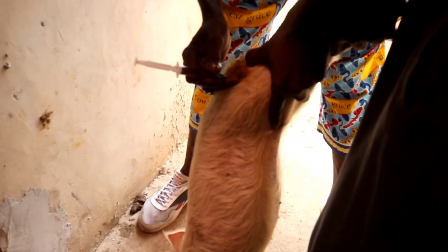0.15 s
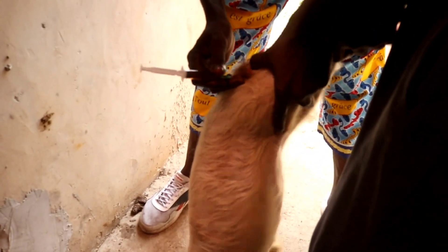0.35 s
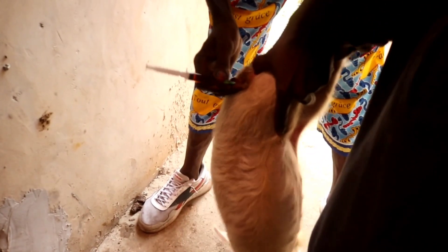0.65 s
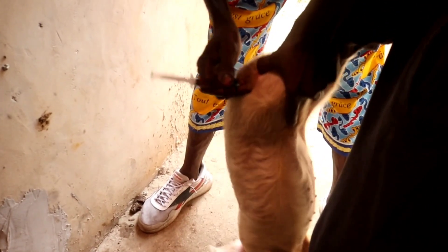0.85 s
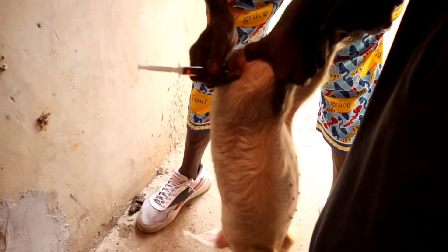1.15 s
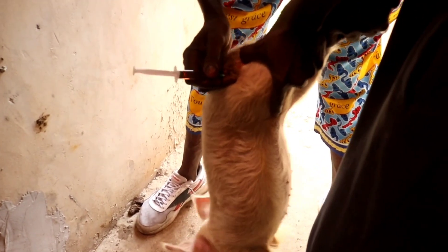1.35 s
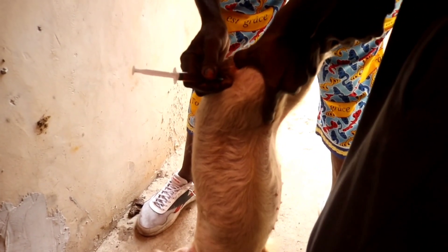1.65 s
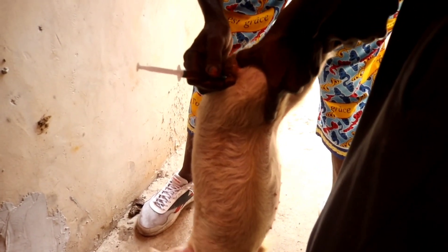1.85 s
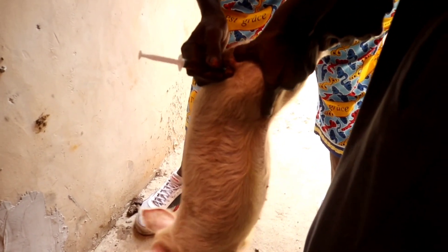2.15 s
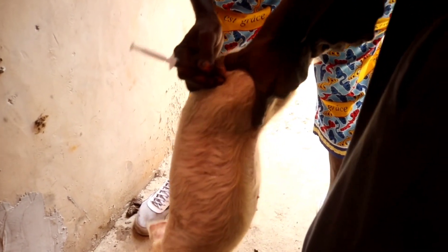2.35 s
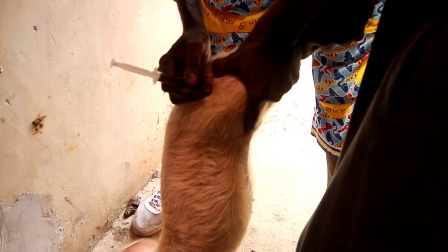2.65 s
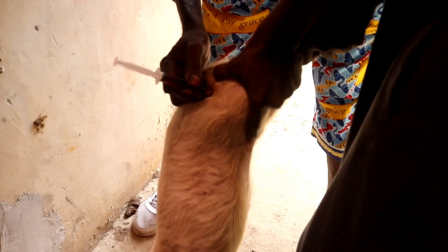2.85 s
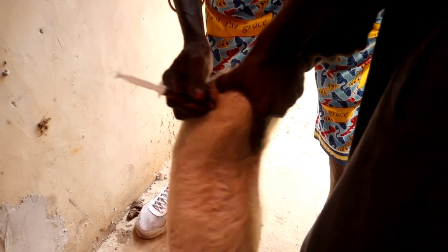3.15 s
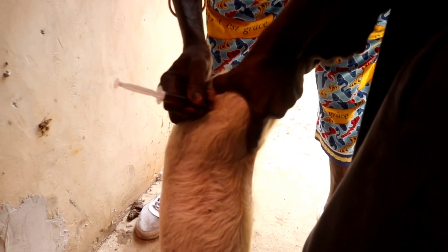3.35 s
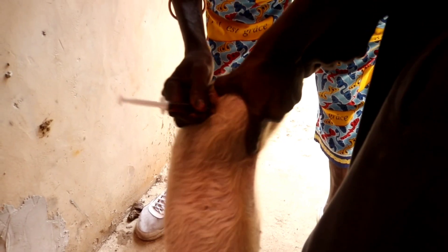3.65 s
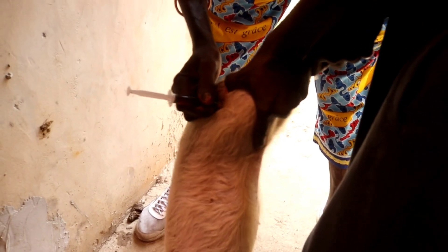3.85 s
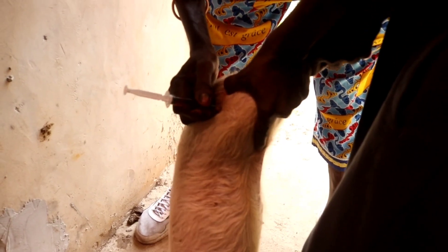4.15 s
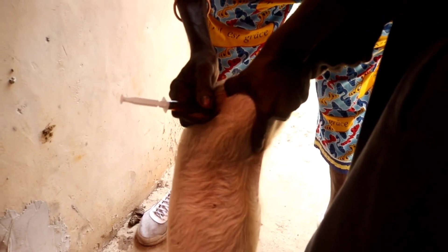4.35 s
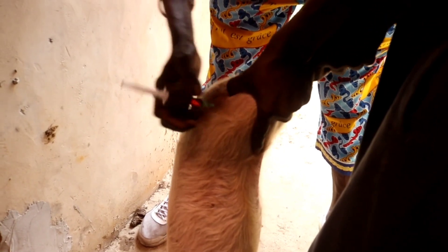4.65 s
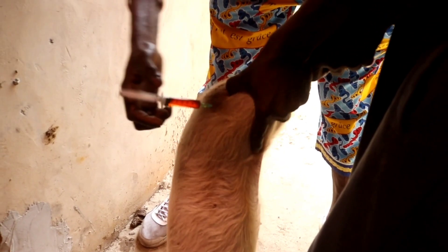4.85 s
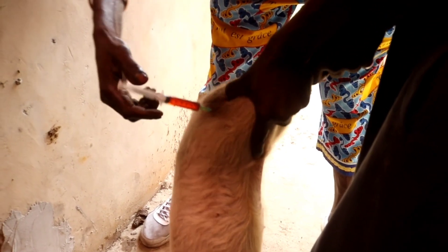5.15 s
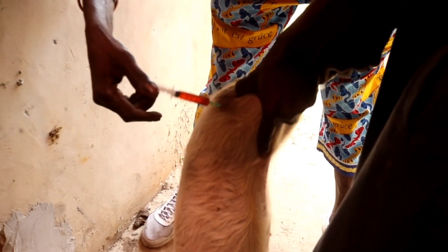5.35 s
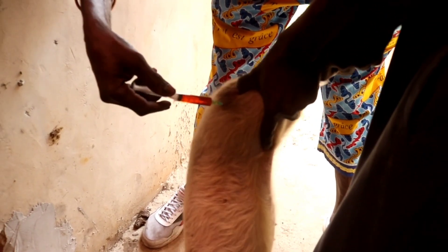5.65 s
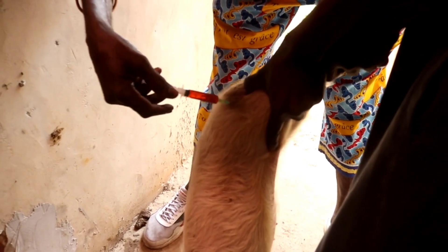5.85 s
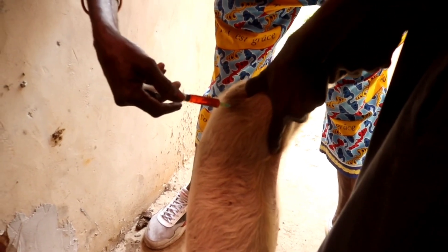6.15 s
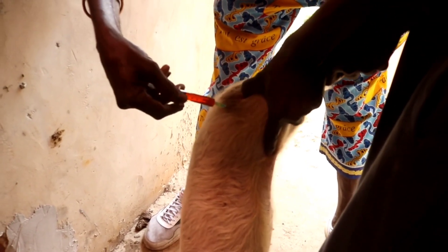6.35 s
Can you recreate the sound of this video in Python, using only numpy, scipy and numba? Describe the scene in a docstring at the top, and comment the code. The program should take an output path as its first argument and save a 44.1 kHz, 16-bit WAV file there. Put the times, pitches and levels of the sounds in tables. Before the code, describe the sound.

A piglet cries out close to a small stereo microphone in a concrete barn. Its short, throaty, rattling barks come about four a second. The early ones are the loudest and break into harsh screams, with hoarse gasps between them. Then the animal tires: the barks grow weaker and further apart, and the last one sinks into a soft moan. Each call leaves a short echo over faint room tone.

```python
"""In a barn, close to a piglet held by the hind legs beside a concrete wall; a small stereo microphone.
An earlier bark is still dying away as the next begin, each a short roll of slow vocal-fold flaps
ringing in the throat. The hardest come early, break into a harsh scream and drive the limiter.
Hoarse gasps fall between the early barks. Then the animal tires, the barks come weaker and further
apart, and the last one ends in a soft moan."""
import sys
import numpy as np
from scipy import signal
from scipy.fft import rfft, irfft
from scipy.io import wavfile
from scipy.ndimage import uniform_filter1d, minimum_filter1d
from numba import njit

SR = 44100
rng = np.random.default_rng(int(sys.argv[2]) if len(sys.argv) > 2 else 0)


def file_out(sig):
    """Save sig as 16-bit WAV at sys.argv[1]."""
    # one column per channel
    cols = np.atleast_2d(sig).T
    # limit, then scale
    lim = np.clip(cols, -1, 1)
    pcm = np.round(lim * 32767).astype(np.int16)
    wavfile.write(sys.argv[1], SR, pcm)


N = 287077

# damping of the five throat resonances, lowest first: (width [Hz])
THROAT_WIDTHS = [77.5, 183.6, 211, 223, 408]


def from_db(db):
    """Decibels to gain."""
    return 10 ** (np.asarray(db) / 20)


def rms_one(x):
    """Scale to rms 1."""
    return x / np.sqrt(np.mean(x ** 2) + 1e-20)


def at_hz(points, hz):
    """Read a curve on a log frequency axis."""
    points_hz, values = np.transpose(points)
    return np.interp(np.log(hz), np.log(points_hz), values)


def filtered(x, hz, kind, order=2):
    """Butterworth filter."""
    return signal.sosfilt(signal.butter(order, hz, kind, fs=SR, output="sos"), x)


def wobble(count, hz):
    """Random wavering below hz, rms 1."""
    return rms_one(filtered(rng.standard_normal(count + 2000), hz, "low")[2000:])


def add(track, start, sound):
    """Mix a sound in at a time in seconds."""
    i = round(start * SR)
    track[i:i + len(sound)] += sound[:N - i]


@njit
def resonate(x, angle, r):
    """Two-pole resonance with a moving centre, gain 1 at its peak."""
    y = np.zeros(len(x))
    for i in range(2, len(x)):
        drive = (1 - r * r) / 2 * (x[i] - x[i - 2])
        y[i] = drive + 2 * r * np.cos(angle[i]) * y[i - 1] - r * r * y[i - 2]
    return y


def tract(x, centres_hz, widths_hz, levels_db):
    """An airway: resonances in parallel, signs alternating."""
    out = 0
    for k, (hz, width, db) in enumerate(zip(centres_hz, widths_hz, levels_db)):
        angle = 2 * np.pi * hz / SR * np.ones(len(x))
        ring = resonate(x, angle, np.exp(-np.pi * width / SR))
        out = out + (-1) ** k * from_db(db) * ring / np.sqrt(width)
    return out


def pulses(hz, jitter):
    """One click a cycle, uneven in spacing and strength."""
    cycles = np.cumsum(hz * np.exp(jitter * wobble(len(hz), 400))) / SR
    return np.diff(np.floor(cycles), prepend=0) * from_db(2 * jitter * rng.standard_normal(len(hz)))


def partials(curve, levels_db, jitter, follows):
    """A wavering tone; the curve gives time, level and the pitch of partial number `follows`."""
    times, hz, db = np.transpose(curve)
    t = times[0] + np.arange(round((times[-1] - times[0]) * SR)) / SR
    pitch_hz = np.interp(t, times, hz) / follows * (1 + jitter * wobble(len(t), 190))
    phase = 2 * np.pi * np.cumsum(pitch_hz) / SR
    tone = sum(from_db(level) * np.sin((k + 1) * phase) for k, level in enumerate(levels_db))
    return np.sqrt(2) * tone * from_db(np.interp(t, times, db)) * signal.windows.tukey(len(t), .15)


def still_air(level_db=-60):
    """Room tone of the barn: faint steady noise with a low hum, nearly centred."""
    # noise spectrum: (frequency [Hz], relative density [dB])
    spectrum = [(24, -65.5), (40, -12.5), (73, -9.5), (113, -8), (177, -13.5), (502, -33.5), (728, -23.5),
                (1730, -19.5), (3220, -30), (15000, -42.5)]
    hz = np.maximum(np.fft.rfftfreq(N, 1 / SR), 1)
    mid, side = irfft(rfft(rng.standard_normal((2, N))) * from_db(at_hz(spectrum, hz)), N)
    return from_db(level_db) * rms_one(mid + 0.13 * side * [[1], [-1]])


def lingering_bark():
    """An earlier bark dies away in the barn, diffuse and unlike at the microphone's two ports."""
    # its tail: (level [dB], fall [dB/s], five resonances [Hz], 2nd to 5th over the 1st [dB])
    tail = (-33.5, 69.5, 662.5, 1403.5, 2602.5, 3082.5, 4285.5, -5, -12.5, -13, -16)
    level_db, fall_db_per_s = tail[:2]
    rings = [tract(rng.standard_normal(SR), tail[2:7], THROAT_WIDTHS, [0, *tail[7:]]) for port in "LR"]
    out = np.zeros((2, N))
    out[:, :SR] = rms_one(np.array(rings)) * from_db(level_db - fall_db_per_s * np.arange(SR) / SR)
    return out


def barn(x, shed_db=-9, shed_stretch=2.96):
    """Direct sound, then a dense tail dying band by band; the larger shed beyond rings on longer."""
    # reverberation of the barn: (frequency [Hz], time to fall 60 dB [s])
    decay_times = [(100, 0.2), (260, 0.37), (700, 0.25), (1800, 0.31), (4800, 0.32), (12800, 0.14)]
    # its strength at the microphone: (frequency [Hz], band gain [dB])
    echo_levels = [(100, -10), (300, 3), (700, 2), (2000, -4), (5000, -4.5), (13000, -13)]
    t = np.arange(SR) / SR
    response, edges_hz = np.zeros((2, SR)), 70 * 2 ** np.arange(0, 8, .5)
    for low, high in zip(edges_hz, edges_hz[1:]):
        hz = np.sqrt(low * high)
        t60 = at_hz(decay_times, hz)
        alike = np.clip(.9 - hz / 1600, 0, 1)   # long waves reach both ports alike
        mid, side = filtered(rng.standard_normal((2, SR)), [low, high], "band")
        band = np.sqrt(1 + alike) * mid + np.sqrt(1 - alike) * side * [[1], [-1]]
        decay = np.hypot(from_db(-60 * t / t60), from_db(shed_db - 60 * t / (t60 * shed_stretch)))
        decay *= np.clip(t / 0.013, 0, 1)   # the echoes build up
        response += band * decay / np.sqrt(2 * np.sum(decay ** 2)) * from_db(at_hz(echo_levels, hz))
    response[0, 0] += 1
    response[1, 2] += 1   # the direct sound reaches the right port two samples later
    return signal.fftconvolve(x[None], response, axes=1)[:, :N]


def scattered(sound, decay_s=.003):
    """Bright scatter off hands, legs and housing, unlike at each port and new as the animal squirms."""
    t = np.arange(round(7 * decay_s * SR)) / SR
    pattern = filtered(rng.standard_normal((2, len(t))), 1880, "high") * np.exp(-t / decay_s)
    return signal.fftconvolve(sound[None], pattern, axes=1) / np.sqrt(decay_s * SR / 2)


def moan():
    """The soft, sinking tone that ends the last bark, with its start time."""
    # its course: (time [s], pitch [Hz], level [dB])
    course = [(6.19, 194.6, -39), (6.235, 167.8, -47.5), (6.29, 151.7, -47), (6.33, 144.9, -46.5),
              (6.37, 147, -53), (6.42, 141.8, -58)]
    # its partials, lowest first: (gain [dB])
    partials_db = [-.5, -1.5, -13, -6, -1, -5, -3, -6, -6, -10]
    return course[0][0], partials(course, partials_db, jitter=.025, follows=1)


def whistle():
    """A high, rising tone inside the second bark's scream, with its start time."""
    # its course: (time [s], third partial [Hz], level [dB])
    course = [(0.361, 4264, -14), (0.375, 4424, -16), (.394, 4545, -18), (0.42, 4580, -8.5), (.44, 4553, 0)]
    # its partials, lowest first: (gain [dB])
    partials_db = [-12, -4, 0, -14]
    return course[0][0], partials(course, partials_db, jitter=.022, follows=3)


def gasp(start, end, level_db, second_hz, *upper_db):
    """Air drawn past fluttering folds: noise lightly beaten by uneven slow flaps."""
    # 1st, 3rd, 4th and 5th throat resonance on the in-breath: (centre [Hz])
    inhale_hz = [607, 1940, 2390, 3160]
    t = np.arange(round((end - start + .05) * SR)) / SR
    flutter = filtered(pulses(np.full(len(t), 65.), jitter=0.28), 138, "low")
    air = rng.standard_normal(len(t)) * (8 + rms_one(flutter))
    swell = np.sin(np.pi * np.clip(t / (end - start), 0, 1)) ** .7
    centres_hz = [inhale_hz[0], second_hz, *inhale_hz[1:]]
    breath = tract(air * swell, centres_hz, THROAT_WIDTHS, [0, *upper_db, -11])
    return from_db(level_db) * rms_one(filtered(breath, [330, 4520], "band", order=3))


def chest_boom(source, opening, peak_db):
    """The chest booms more as the breath runs out, and takes a larger share of a weak bark."""
    # chest resonances: (centre [Hz], width [Hz], gain [dB])
    modes = [(114, 26, -2), (184.3, 42, 3), (316, 102, -1)]
    gain_db = 17.5 - 0.32 * (peak_db + 18)
    return tract(source * opening ** 0.19, *np.transpose(modes)) * from_db(gain_db)


def treble_edge(bright):
    """The top of a bark, lifted by a high ring that stands out in a scream."""
    # the ring: (centre [Hz], width [Hz], gain [dB])
    high_ring = (5570, 1210, 6.4)
    hz, width, db = high_ring
    ringing = bright + tract(bright, [hz], [width], [db]) * np.sqrt(width)
    return filtered(filtered(ringing, 5940, "high", order=4), 4180, "low", order=1)


def nose(voice, scream_gain):
    """The nose draws off a band between the 2nd and 3rd resonance, less in a scream."""
    # the dip: (centre [Hz], width [Hz], depth [0-1])
    dip = (2050, 500, .45)
    hz, width, depth = dip
    band = np.sqrt(width) * tract(voice, [hz], [width], [0])
    return voice - depth / np.sqrt(1 + scream_gain ** 2) * band


def throat(opening, fifth_db, first_hz, second_hz, travel, fourth_hz, second_db, shut_db, open_db):
    """The mouth opens through the bark and moves the centres and levels of five resonances; their widths stay
    fixed."""
    # 1st and 2nd resonance: (rise per unit of glide at mouth travel 1 [Hz])
    rises_hz = [125, 190.1]
    glide = 1.5 * opening ** .8 - .4
    mouth = np.clip((opening - .15) / .7, 0, 1)
    centres_hz = [hz + rise * travel * (glide - .5) for hz, rise in zip([first_hz, second_hz], rises_hz)]
    upper_hz = [(2525, 2610), (3290, fourth_hz), (4354, 4470)]   # 3rd to 5th: (shut [Hz], open [Hz])
    centres_hz += [shut + (wide - shut) * glide for shut, wide in upper_hz]
    centres_hz[2] = np.minimum(centres_hz[2], centres_hz[3] - 380)   # neighbours stay apart
    upper_db = shut_db + (open_db - shut_db) * mouth
    trims_db = [second_db, upper_db, upper_db, fifth_db]
    base_db = [(.5, -2), (2, 0), (-2, 2), (-3, -6)]   # 2nd to 5th over the 1st: (shut [dB], open [dB])
    levels_db = [shut + (wide - shut) * mouth + trim for (shut, wide), trim in zip(base_db, trims_db)]
    return centres_hz, THROAT_WIDTHS, [0] + levels_db


def effort(opening, peak_db, swell_db, peak_at, sag_db=6):
    """Level in dB through a roll: a bent climb to the peak, then a sag to the last flap."""
    climb = np.clip(1 - opening / peak_at, 0, 1) ** 1.92
    return peak_db - swell_db * climb - sag_db * np.clip(opening - peak_at, 0, 1)


def scream(hz):
    """Tight folds buzz in rushing air; every second cycle is weaker, adding lines half-way between."""
    buzz = .5 * pulses(hz, jitter=.07) + pulses(hz / 2, jitter=.11)
    return rms_one(buzz - buzz.mean()) + .7 * rng.standard_normal(len(hz))


def flap_roll(t, first, last, flaps, slowing=.09, puff_s=.0025):
    """The folds flap shut with a click and a puff of air, more slowly at both ends of the roll."""
    even = np.linspace(0, 1, round(flaps))
    times = first + (last - first) * (even + slowing * np.sin(2 * np.pi * even) / (2 * np.pi))
    times[1:-1] += rng.normal(0, .0007, len(times) - 2)
    clicks = np.zeros(len(t))
    clicks[((times - first) * SR).astype(int)] = from_db(rng.normal(0, 1.4, len(times)))
    clicks[t > last - .002] *= from_db(-5)   # the last flap is softer as the breath gives out
    puffs = signal.lfilter([1], [1, -np.exp(-1 / (puff_s * SR))], clicks) * rng.standard_normal(len(t))
    return rms_one(clicks + 0.31 * puffs)


def bark(first, last, flaps, peak_db, swell_db, peak_at, scream_db, treble_db, *throat_shape):
    """Slow flaps and a scream locked to the second resonance ring in the throat and chest."""
    hoarse_db, scream_rise_s, release_s = -15, 0.027, 0.016
    t = first + np.arange(round((last - first + .075) * SR)) / SR
    opening = np.clip((t - first) / (last - first), 0, 1)
    peak_at = np.clip(peak_at, .05, 1)
    resonances = throat(opening, *throat_shape)
    roll = flap_roll(t, first, last, flaps)
    # a rasp lies under all flaps; the scream grows out of it shortly before the peak
    scream_start = first + 0.73 * peak_at * (last - first)
    scream_rise = np.clip((t - scream_start) / scream_rise_s, 0, 1)
    scream_gain = np.hypot(from_db(hoarse_db), from_db(scream_db) * scream_rise)
    rasp = scream_gain * scream(hz=resonances[0][1])
    flapping = roll * from_db(-0.45 * max(scream_db, 0))   # a throat tight enough to scream flaps less
    # effort holds the loudness, so a scream takes its share from the flaps
    level_db = effort(opening, peak_db, swell_db, peak_at)
    release = np.clip((last + .012 - t) / release_s, 0, 1)
    breath = from_db(level_db) * release / np.sqrt(1 + scream_gain ** 2)
    source = (flapping + rasp) * breath
    voice = tract(source, *resonances) / np.std(tract(roll, *resonances))
    voice = nose(filtered(voice, 503, "high", order=6), scream_gain)
    # harder breath and a wider mouth are brighter
    bright_db = treble_db + 10.5 + 2.8 * (level_db - peak_db) + 8 * opening
    bright = (filtered(flapping, 3600, "low") + from_db(7.5) * rasp) * breath * from_db(bright_db)
    return voice + treble_edge(bright) + chest_boom(source, opening, peak_db)


def piglet():
    """All the animal's calls, and what is scattered of them close by into each port."""
    # rolls of flaps: (first flap [s], last flap [s], flaps [count], peak effort [dB], swell to it [dB],
    # peak place in the roll [0-1], scream [dB], treble [dB], 5th resonance trim [dB],
    # 1st and 2nd resonance mid-glide [Hz], mouth travel [0-2], 4th resonance open [Hz],
    # 2nd resonance trim [dB], trim of 3rd and 4th when shut [dB], when open [dB])
    barks = [(0.097, 0.205, 10, -18.5, 28, 0.56, -5, -25, -2, 690, 1460, 1.09, 2860, -.5, -1.5, -0.5),
             (0.322, 0.446, 12, -8.5, 22.5, 0.36, 2.5, -11, 1.5, 700, 1523, 0.039, 3250, 1.5, -7, 3),
             (0.534, 0.631, 10, -9, 27, 0.48, 6, -20.5, -4, 662, 1595, 1.56, 3490, 1.5, -1, -3),
             (0.775, 0.865, 9, -10.5, 15, 0.63, 6.5, -17, -4, 684, 1592, 0.88, 3690, 0, -9, -0.5),
             (1.019, 1.106, 8, -14, 13.5, .65, 5, -23, 2, 708, 1310, 1.93, 3100, 2, -1.5, -0.5),
             (1.286, 1.349, 7, -11.5, 11, 0.43, 2.5, -18.5, 3, 662, 1587, 0.28, 3010, 0.5, .5, 2),
             (1.526, 1.603, 8, -15.5, 13.5, 0.78, -10, -28, -1, 715, 1514, 0.48, 3180, -2, 1, -4.5),
             (1.832, 1.914, 8, -19, 5, 1, -1, -26, -0.5, 690, 1480, .2, 3100, 0, 1, -2),
             (1.995, 2.032, 4, -38.5, -3.5, 0, 0, -49, -4, 670, 1490, 0.067, 3230, -5, -18, -23),
             (2.101, 2.182, 8, -20.5, 7.5, 0.82, 0, -24, 5, 602, 1470, 0.32, 2990, 5.5, -8, 5),
             (2.348, 2.426, 8, -19.5, 8.5, 0.99, -16, -20.5, -1.5, 688, 1386, 0.82, 3030, 1.5, -7.5, -2.5),
             (2.643, 2.743, 9, -21, 25, .28, -5, -25.5, -3.5, 640, 1435, 0.79, 2910, -2, -13.5, 2.5),
             (2.928, 3.03, 10, -18.5, 19.5, 0.32, -18, -22.5, -4, 688, 1465, 1.2, 3030, -2, 0, -2),
             (3.184, 3.276, 9, -17, 14, 0.52, -2.5, -32, -4, 698, 1550, 1.17, 3210, -3.5, -10, -7.5),
             (3.502, 3.595, 9, -17.5, 12.5, 0.37, -15, -21.5, -0.5, 680, 1511, .3, 3080, -2, -3.5, -2.5),
             (3.725, 3.796, 7, -15, 19, 1, -5.5, -32, -0.5, 683, 1423, 1.03, 2870, 3.5, -1, -7),
             (4.159, 4.238, 7, -20.5, 12.5, 0.83, -15, -16.5, 3, 685, 1415, 1.43, 3210, 2.5, -9, 2.5),
             (4.607, 4.688, 7, -21.5, 24.5, 0.65, -20, -19.5, 0, 666, 1417, 1.74, 3120, -1.5, -7, -2.5),
             (4.981, 5.077, 8, -25, 28, 0.66, -23, -31, 3.5, 610, 1273, 0.44, 3170, 1, -0.5, -0.5),
             (5.305, 5.386, 6, -20.5, 17.5, 0.44, -11, -22, -3.5, 686, 1478, 1.03, 3200, -2, -3, -2.5),
             (5.616, 5.696, 6, -25, 22.5, 0.5, -19, -20.5, 0.5, 735, 1445, 0.46, 3180, 1, -9, 0.5),
             (6.132, 6.226, 7, -26.5, 14.5, 0.29, -37, -15.5, 1, 703, 1370, 0.62, 3160, 2, -4, -5.5)]
    # in-breaths: (start [s], end [s], level [dB], 2nd resonance [Hz], 2nd to 4th over the 1st [dB])
    gasps = [(0.658, 0.76, -33.5, 1460, -26, -17, 7), (0.919, 1.024, -34, 1470, -16, -1.5, -2),
             (1.16, 1.316, -29.5, 1150, -5, -2.5, -2.5), (1.397, 1.56, -35.5, 1240, 1, 2, 3),
             (1.707, 1.845, -33, 1090, -9, -1.5, -7), (1.95, 2.05, -39.5, 1490, -16, -1, 3),
             (3.948, 4.094, -36, 1130, -4, -7.5, -14.5)]
    calls = [(row[0], bark(*row)) for row in barks] + [(row[0], gasp(*row)) for row in gasps]
    calls += [whistle(), moan()]
    voice, scatter = np.zeros(N), np.zeros((2, N))
    for start, sound in calls:
        add(voice, start, sound)
        for port, part in zip(scatter, scattered(sound)):
            add(port, start, part)
    return voice, scatter


def scene():
    """What reaches the microphone: the piglet close by, a touch louder on the right, the barn around."""
    voice, scatter = piglet()
    return (barn(voice) + scatter) * from_db([[-1.2], [-.8]]) + lingering_bark() + still_air()


def record(dry, threshold_db=-4, release_db_per_s=150, ceiling=.68, cutoff_hz=16200):
    """The small microphone limits loud barks; lopsided overload adds a thump; the top is cut."""
    peaks = -minimum_filter1d(-np.abs(dry).max(axis=0), size=88)
    level_db = 20 * np.log10(peaks + 1e-9)
    ramp_db = release_db_per_s * np.arange(N) / SR
    held_db = np.maximum.accumulate(level_db + ramp_db) - ramp_db
    over_db = np.maximum(held_db - threshold_db, 0)
    limited = dry * from_db(-.7 * uniform_filter1d(over_db, size=44))
    thump = filtered(limited ** 4, [18, 90], "band") * [[.5], [-1.1]]
    rounded = ceiling * np.tanh((limited + thump) / ceiling)
    return signal.sosfilt(signal.cheby2(12, 70, cutoff_hz, fs=SR, output="sos"), rounded)


dry = scene()
out = record(dry)
file_out(out)
```